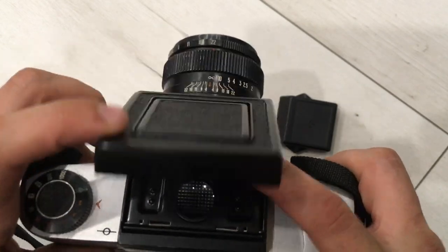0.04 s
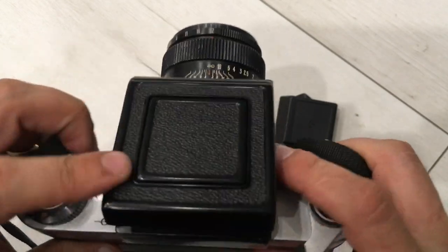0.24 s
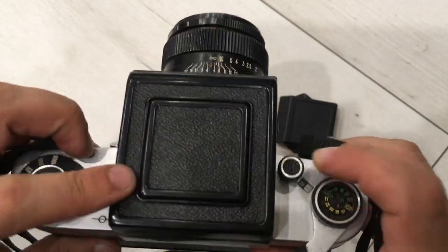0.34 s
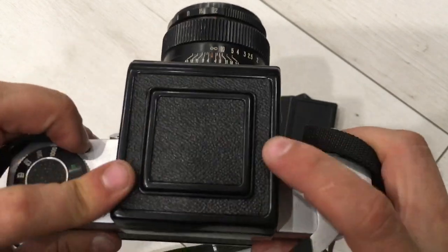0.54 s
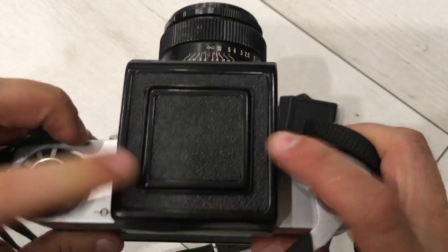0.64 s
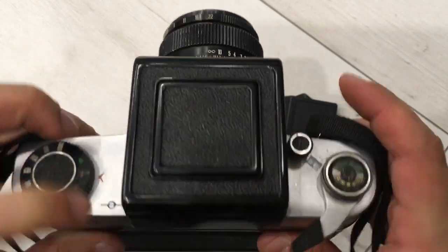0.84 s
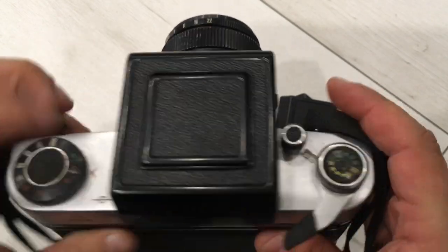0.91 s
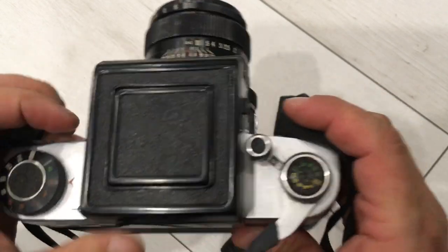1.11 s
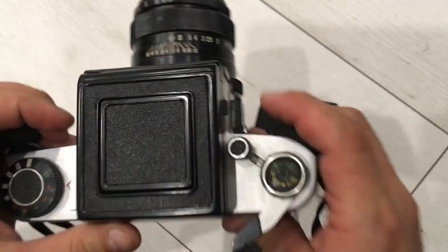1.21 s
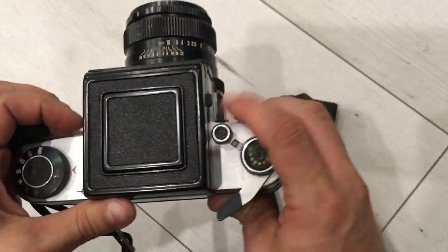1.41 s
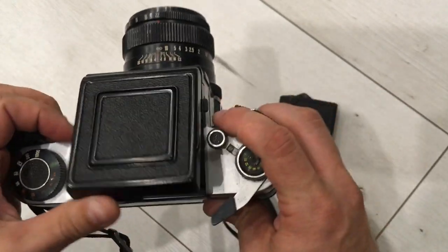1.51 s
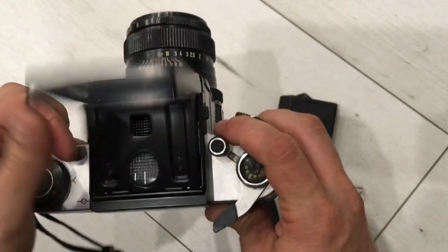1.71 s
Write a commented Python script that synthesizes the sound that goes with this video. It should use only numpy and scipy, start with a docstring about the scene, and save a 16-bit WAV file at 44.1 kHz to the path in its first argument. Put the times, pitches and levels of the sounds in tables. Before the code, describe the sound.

A camera's folding metal viewfinder hood snaps shut, followed by faint finger ticks.

```python
"""The folding metal hood of a camera viewfinder is pushed shut by hand, close by, in a quiet room.
The side flaps click in (0.2 s) and the lid slides down. It snaps into its catch (0.37 s),
ringing the hood and shaking the body with a thump. From 0.9 s fingers rub and tick on the body.
A low hum and a faint hiss lie underneath throughout."""
import sys
import numpy as np
from scipy import signal
from scipy.fft import rfft, irfft
from scipy.io import wavfile

SR = 44100
rng = np.random.default_rng(int(sys.argv[2]) if len(sys.argv) > 2 else 0)


def persist_wave(psi):
    """Save psi, clipped to +-1, as 16-bit WAV."""
    counts = np.round(np.clip(psi, -1, 1) * 32767).astype(np.int16)
    wavfile.write(sys.argv[1], SR, np.atleast_2d(counts).T)


N = 77175
T = np.arange(N) / SR


def clicks(first_touch=0.25, crack_gain=13.12, ping_q=12, ping_base_db=-7.5, ring_db=-4.5):
    """Flap, catch and body contacts: impact plus brief rattle with one resonance; blows ring the hood."""
    # (time [s], relative level [dB], bass [dB], lows [dB], treble [dB], rattle [s], ping [Hz], ping [dB])
    contacts = [(0.1618, -40, -7.5, -3.5, -12, 0.012, 6100, -9.5),
                (0.1917, -25.5, 2.5, -1.5, -8, 0.0033, 9000, 7.5),
                (.2038, -20.5, -33, -0.5, -3.5, 0.0036, 2640, 0),
                (0.3494, -33.5, -2.5, -3.5, 5.5, 0.01, 1019, 4),
                (0.3556, -33, -21, -12, -12, 0.0039, 3190, 0),
                (0.3707, -5.5, -2, -2.5, -2, .005, 2350, -12), (.3723, -12.5, 9, -4, 0.5, .007, 1090, -2.5),
                (0.376, -10.5, -2.5, -2.5, 2.5, 0.0022, 2530, -3.5),
                (0.5755, -43.5, 0, -9.5, -22, 0.0025, 2460, 1),
                (0.9811, -40, 11.5, 7, 9.5, 0.0024, 11800, 6), (0.9902, -43, 9.5, 10, 2, 0.013, 3020, -1.5),
                (1.052, -59, 9.5, 6, 4, .007, 1000, 6), (1.188, -56.5, -1, -5, -2, .006, 3620, -5),
                (1.337, -57, -7.5, -1.5, 3, .004, 2890, -6), (1.522, -44, -6, 10, -3, 0.0047, 7860, 0),
                (1.5325, -56.5, 8, 6.5, 2, 0.0041, 1190, 4), (1.568, -57, -2, 5.5, -12.5, 0.0063, 1990, -3),
                (1.7188, -45.5, 13, 5, -13.5, .006, 2880, -3), (1.7363, -36, 2.5, 8, 4, 0.0049, 3000, -6)]
    # bare contact: (frequency [Hz], gain [dB])
    contact_spectrum = [(30, -47), (70, -14), (380, -7), (510, -22), (800, -4.5), (1100, -0.5), (1450, -5),
                        (2500, 4.5), (3400, 5.5), (5500, -1.5), (9000, 2), (10300, -4), (12500, 1),
                        (15200, -1.5), (16200, -20)]
    # (frequency [Hz], level [dB], t60 [s])
    hood_modes = [(1160, -19, 0.063), (1206, -34.5, .35), (2049, -19.5, .06), (2374, -10.5, 0.076),
                  (2486, -26.5, 0.37), (2650, -10.5, 0.034), (2965, -15, 0.069), (3250, -13, .07),
                  (3430, -15.5, .07), (3675, -17.5, 0.09), (4020, -17, .05), (4580, -14.5, 0.093),
                  (5165, -16, .07), (6290, -17, 0.051), (9630, -21.5, .07), (12870, -17, .06)]
    cracks, blows, t = np.zeros(N), np.zeros(N), T[:SR // 10]
    for s, db, bass_db, lows_db, treble_db, rattle_s, ping_hz, ping_db in contacts:
        envelope = np.exp(-(t / rattle_s) ** 1.6)  # holds, then drops
        rattle = unit(rng.standard_normal(len(t)) * envelope)
        rattle[0] += first_touch
        ping = unit(signal.lfilter(*signal.iirpeak(ping_hz, ping_q, fs=SR), rattle))
        crack = unit(rattle) + from_db(ping_base_db + ping_db) * ping
        colour = [(460, bass_db), (1080, lows_db), (2800, 0), (11000, treble_db)]
        add(cracks, s, from_db(db) * coloured(crack, colour))
        add(blows, s, from_db([ring_db + 1.11 * db]))  # ring grows faster than force
    return crack_gain * coloured(cracks, contact_spectrum) + ring(blows, hood_modes)


def thump(time_s=0.371, blow_db=-32):
    """The closing blow shakes the camera body; its modes alternate in sign."""
    # (frequency [Hz], level [dB], t60 [s])
    body_modes = [(63.6, -4, .12), (91.2, -2, .09), (128.6, -3, .11), (172.6, -4, 0.055),
                  (255, -4.5, 0.057), (372, -11, 0.031), (739, -11, .14), (882, -7.5, .09), (991, -6, 0.36)]
    blow = np.zeros(N)
    add(blow, time_s, from_db([blow_db]))
    return sum((-1) ** k * ring(blow, [mode]) for k, mode in enumerate(body_modes))


def rubs(grain_db=4.5, grain_samples=16):
    """Sliding flaps and fingers: grainy friction swells and dies; a narrow band squeaks."""
    # (peak time [s], rise [s], fall [s], level [dB], centre [Hz], width [octaves])
    slides = [(.166, 0.0014, 0.0077, -48.5, 825, 0.28), (0.241, 0.028, 0.0066, -47.5, 2780, 0.77),
              (0.328, 0.0045, 0.002, -38, 2780, 0.29), (0.326, .012, 0.0034, -48, 10780, .8),
              (0.349, 0.0022, 0.0095, -40, 6000, 3.3), (0.974, 0.048, 0.026, -56, 12030, 0.63),
              (.97, .05, .05, -60.5, 332, 1.57), (1.361, 0.0067, 0.0074, -42, 1515, 0.74),
              (1.363, 0.0053, 0.0051, -47.5, 603, .12), (1.426, 0.03, 0.013, -53.5, 9500, 1.1),
              (1.4722, 0.0055, 0.0037, -41.5, 11600, 1.1), (1.720, 0.0058, .006, -52, 3950, 1.5)]
    skirt_db = (0, -6, -18, -52)  # 0 to 3 widths off centre
    out = np.zeros(N)
    for peak_s, rise_s, fall_s, db, hz, octaves in slides:
        noise = rng.standard_normal(N)
        roughness = np.repeat(rng.standard_normal(N // grain_samples + 1), grain_samples)[:N]
        grains = noise * from_db(grain_db * roughness)
        band = [(hz * 2 ** (k * octaves), skirt_db[abs(k)]) for k in range(-3, 4)]
        swell = np.exp(-np.abs(T - peak_s) / np.where(T < peak_s, rise_s, fall_s))
        out += from_db(db) * np.linalg.norm(swell) * unit(coloured(grains, band) * swell)
    return out


def skin_ticks(start_s=0.9, end_s=1.68, rate_per_s=32, touch_db=-47, spread_db=6):
    """Skin ticks on the body as the grip changes: a few clear ticks, the rest at random."""
    # (time [s], level [dB])
    clear_ticks = [(.9695, -35), (.9775, -36), (1.4160, -38), (1.4225, -38), (1.4310, -37), (1.4895, -34)]
    # (frequency [Hz], gain [dB])
    tick_spectrum = [(500, -25), (3000, -11), (8000, -1), (13000, 2), (16000, -6)]
    onsets = (rng.random(N) < rate_per_s / SR) & (T > start_s) & (T < end_s)
    touches = onsets * from_db(touch_db + spread_db * rng.uniform(-1, 1, N))
    for s, db in clear_ticks:
        add(touches, s, from_db([db]))
    return coloured(touches, tick_spectrum)


def room(x, tail_db=-17, onset_s=0.015):
    """Two near echoes and a diffuse tail whose top dies first."""
    # (frequency [Hz], t60 [s])
    decay_times = [(160, 0.46), (450, 0.9), (1020, 0.56), (2450, 0.91), (4000, 0.67), (6500, 0.77),
                   (10000, 0.4), (15000, 0.4)]
    # (delay [s], level [dB])
    echoes = [(0.0106, -20.5), (0.0209, -17.5)]
    # (frequency [Hz], gain [dB])
    room_colour = [(110, -3.5), (430, -6.5), (780, 1), (1050, -1.5), (1700, -1.5), (2400, -3.5), (3200, -5),
                   (6000, -2), (14000, -2)]
    edges_hz = np.geomspace(60, 18000, num=13)
    hz = np.arange(N // 2 + 1) * SR / N
    white = rfft(rng.standard_normal(N))
    tail = np.zeros(N)
    for low, high in zip(edges_hz, edges_hz[1:]):
        band = irfft(white * ((hz >= low) & (hz < high)), N)
        tail += band * from_db(-60 * T / at_hz(decay_times, np.sqrt(low * high)))
    build_up = 1 - np.exp(-(T / onset_s) ** 2)
    response = from_db(tail_db) * unit(tail * build_up)
    for s, db in echoes:
        add(response, s, from_db([db]))
    return signal.fftconvolve(x, coloured(response, room_colour))[:N]


def hum():
    """Steady mains hum and faint high whines."""
    # (frequency [Hz], rms level [dB])
    steady_tones = [(100, -62), (200, -77.5), (2304, -80.5), (5696, -82), (8586, -74.5), (9152, -73.5),
                    (14090, -73), (14186, -72.5), (14282, -85)]
    return sum(np.sqrt(2) * from_db(db) * np.sin(2 * np.pi * (hz * T + rng.random()))
               for hz, db in steady_tones)


def hiss(rms_db=-62.5):
    """Steady noise floor, strongest in the bass."""
    # (frequency [Hz], relative level [dB])
    floor_spectrum = [(20, -32.5), (35, -14), (58, 1.5), (85, -4), (150, -6.5), (310, -9), (600, -21),
                      (1000, -17), (1600, -21), (2400, -20), (3400, -19.5), (4900, -26), (7000, -25),
                      (8800, -21), (10500, -27.5), (13200, -20.5), (14300, -16), (15200, -23.5),
                      (16200, -39)]
    noise = coloured(rng.standard_normal(N + SR), floor_spectrum)[SR:]
    return from_db(rms_db) * np.sqrt(N) * unit(noise)


def from_db(db):
    """Decibels to gain."""
    return 10 ** (np.asarray(db) / 20)


def unit(x):
    """Scale to unit energy."""
    return x / np.sqrt(np.sum(x ** 2) + 1e-20)


def at_hz(points, hz):
    """Read a table on a log-frequency axis."""
    points_hz, values = np.transpose(points)
    return np.interp(np.log(hz + 1), np.log(points_hz), values)


def coloured(x, points, size=8192):
    """Minimum-phase filter through points of (frequency [Hz], gain [dB])."""
    gain = from_db(at_hz(points, np.arange(size // 2 + 1) * SR / size))
    cepstrum = irfft(np.log(gain))
    cepstrum[1:size // 2] *= 2
    cepstrum[size // 2 + 1:] = 0
    response = irfft(np.exp(rfft(cepstrum)))
    return signal.fftconvolve(x, response)[:len(x)]


def add(out, start_s, x):
    """Mix x in from start_s."""
    i = int(np.clip(start_s * SR, 0, N - 1))
    out[i:i + len(x)] += x[:N - i]


def ring(x, modes):
    """Damped modes; a unit impulse rings each at its own level."""
    out = np.zeros(N)
    for hz, db, t60_s in modes:
        radius, angle = from_db(-60 / (t60_s * SR)), 2 * np.pi * hz / SR
        feedback = [1, -2 * radius * np.cos(angle), radius ** 2]
        out += from_db(db) * signal.lfilter([.5, 0, -.5], feedback, x + 1e-18)
    return out


def limiter(x, ceiling_db=-3, release_db_per_s=899):
    """Peaks over the ceiling cut the gain at once; it recovers quickly."""
    over_db = np.maximum(20 * np.log10(np.abs(x) + 1e-9) - ceiling_db, 0)
    release_db = release_db_per_s * T
    cut_db = np.maximum.accumulate(over_db + release_db, axis=-1) - release_db
    return x * from_db(-cut_db)


def scene():
    """Camera, room and background, mono."""
    camera = clicks() + thump() + rubs() + skin_ticks()
    return (camera + room(camera) + hum() + hiss())[None]


def record(dry):
    """Limit the snap, then band-limit to 40 Hz - 16 kHz."""
    lowpass = signal.ellip(10, .2, 75, 16000, fs=SR, output="sos")
    highpass = signal.butter(3, 40, "high", fs=SR, output="sos")
    return signal.sosfilt(lowpass, signal.sosfilt(highpass, limiter(dry)))


dry = scene()
out = record(dry)
persist_wave(out)
```